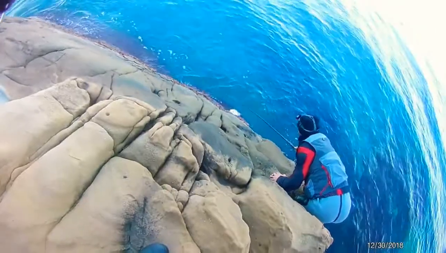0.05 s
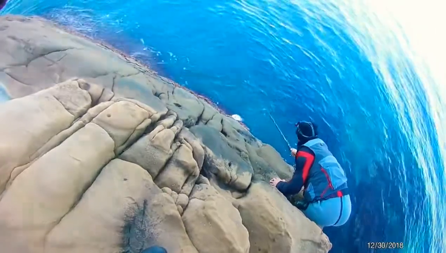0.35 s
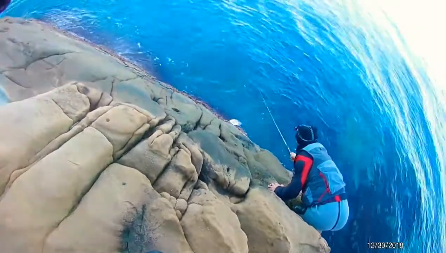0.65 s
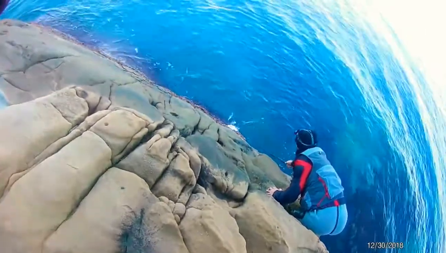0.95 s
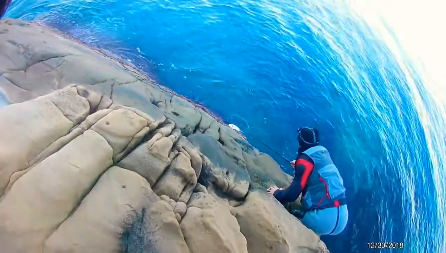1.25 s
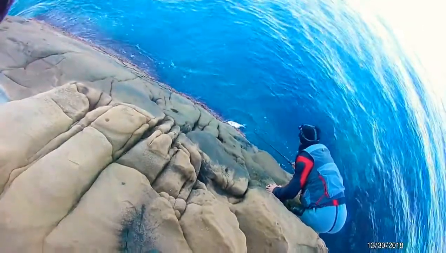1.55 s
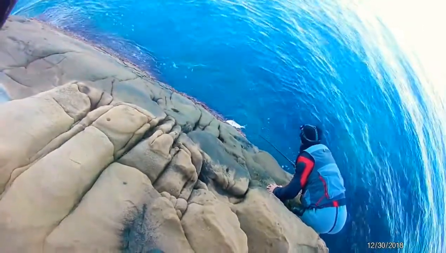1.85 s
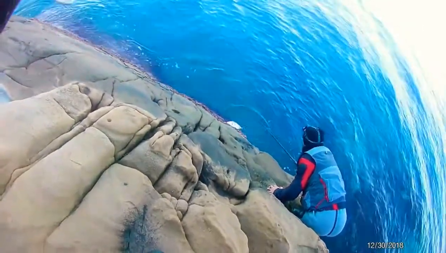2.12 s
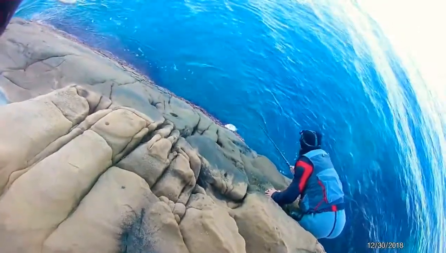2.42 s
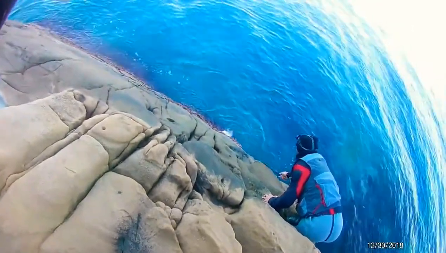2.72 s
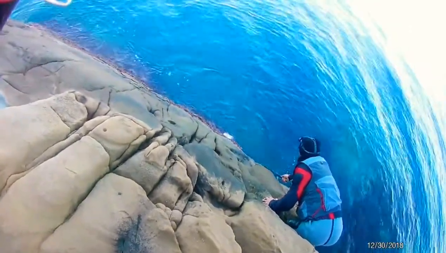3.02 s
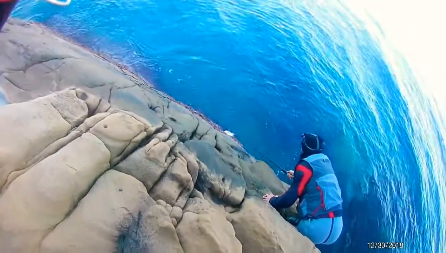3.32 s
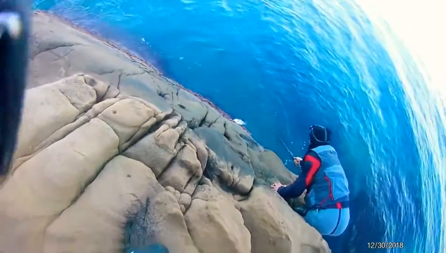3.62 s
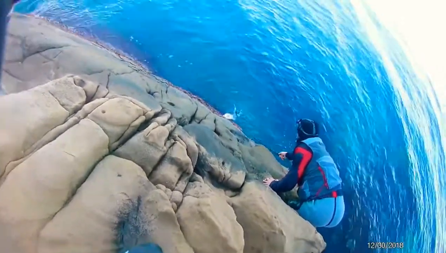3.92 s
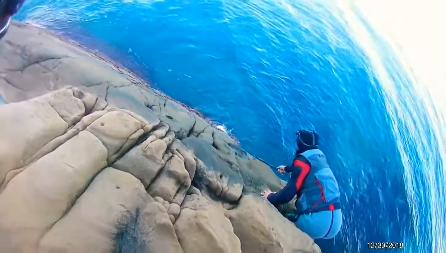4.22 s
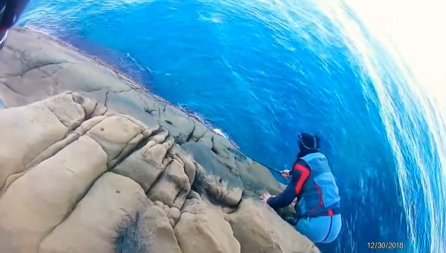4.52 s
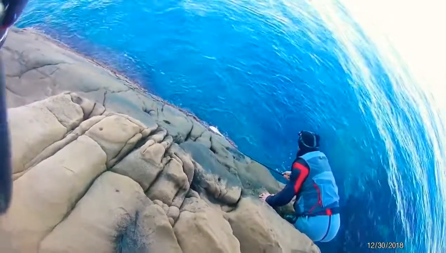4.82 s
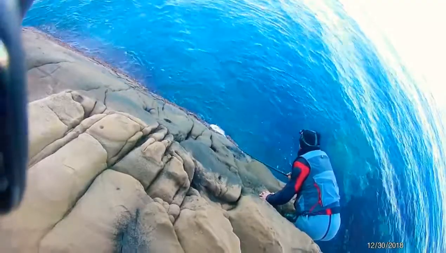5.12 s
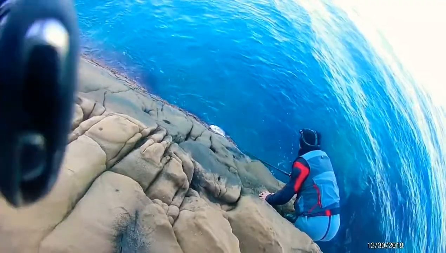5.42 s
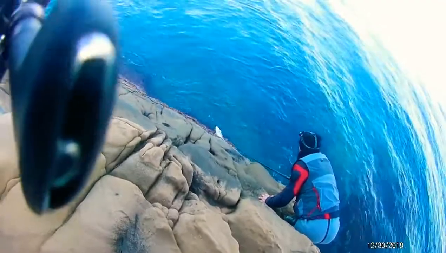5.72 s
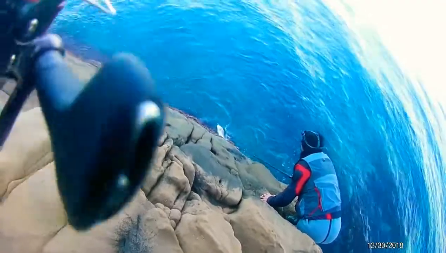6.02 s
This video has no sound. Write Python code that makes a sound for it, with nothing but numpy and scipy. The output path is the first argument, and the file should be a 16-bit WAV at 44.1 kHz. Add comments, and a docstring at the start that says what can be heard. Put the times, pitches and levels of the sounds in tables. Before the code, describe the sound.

Sea water laps and gurgles softly against rocks, a little muffled, with a few sharp close clicks of fishing gear.

```python
"""Sea lapping on a rocky shore

Heard from above the rocks, on the microphone of a small camera in a closed case. The wash swells and
sinks, foam hisses, air pockets gurgle in the clefts and spray pings on the water. Close by, handled
fishing gear clicks and knocks, and one gust brushes past. The case muffles the sound above 1 kHz."""
import sys
import numpy as np
from scipy import signal
from scipy.io import wavfile
from scipy.ndimage import uniform_filter1d

SR = 44100
rng = np.random.default_rng(int(sys.argv[2]) if len(sys.argv) > 2 else 0)


def dump(signal):
    """Clip the signal to [-1, 1] and save it as 16-bit WAV at the path in sys.argv[1]."""
    limited = np.clip(np.atleast_2d(signal).T, -1, 1)
    pcm = np.round(limited * 32767).astype(np.int16)
    wavfile.write(sys.argv[1], SR, pcm)


N = 276066


def amp(db):
    """Decibels to gain."""
    return 10 ** (np.asarray(db) / 20)


def unit(x):
    """Scales to rms 1."""
    return x / np.sqrt(np.mean(x ** 2) + 1e-20)


def decay(t, t60):
    """Falls by 60 dB in t60 seconds."""
    return np.exp(-np.log(1000) * t / t60)


def level_at(spectrum, hz):
    """Level of a spectrum in dB, interpolated along log frequency."""
    freqs, db = np.transpose(spectrum)
    return np.interp(np.log(hz + 1), np.log(freqs), db)


def add(mix, start, sound):
    """Lays a sound into the mix, start seconds in."""
    part = mix[max(round(start * SR), 0):][:len(sound)]
    part += sound[:len(part)]


def colour(x, spectrum):
    """Minimum-phase filter with the given spectrum."""
    hz = abs(np.fft.fftfreq(4096, 1 / SR))
    log_gain = np.log(amp(level_at(spectrum, hz)))
    taps = np.fft.ifft(np.exp(np.conj(signal.hilbert(log_gain)))).real
    return signal.oaconvolve(x, taps[:len(taps) // 2])[:N]


def noise(spectrum, patchy_db):
    """Coloured noise whose level drifts in patches of time and frequency."""
    frames = dict(fs=SR, nperseg=1024, noverlap=768)
    hz, _, bins = signal.stft(rng.standard_normal(N), **frames)
    patches = uniform_filter1d(rng.standard_normal(bins.shape), size=8, axis=0)
    patches = unit(uniform_filter1d(patches, size=8, axis=1))
    bins *= amp(level_at(spectrum, hz)[:, None] + patchy_db * patches)
    return unit(signal.istft(bins, **frames)[1][:N])


def impulses(per_s, spread_db):
    """Random impulses: many small, a few large."""
    size = amp(spread_db * np.minimum(rng.exponential(1, N), 4))
    return size * rng.choice([-1, 1], N) * (rng.random(N) < per_s / SR)


def swell(crest, length, rise_share=0.38):
    """A lopsided bell that builds to 1 at the crest and drains away more slowly."""
    t = (np.arange(N) / SR - crest) / length
    width = np.where(t < 0, rise_share, 1 - rise_share)
    return np.exp(-.5 * (t / width) ** 2)


# waves on the rocks below: (crest time [s], length [s], water [dB], foam [dB], churning [dB])
WAVES = [(0.038, 0.13, -51.5, -76, -75), (0.685, 0.6, -55.5, -72, -61.5), (1.42, 0.43, -56.5, -79, -71),
         (1.987, 0.4, -62, -75.5, -58.5), (2.346, 0.19, -67, -70, -65), (2.595, 0.6, -53, -77, -60),
         (3.48, 0.19, -74, -71, -77), (3.966, 0.6, -56.5, -71, -57), (4.33, 0.69, -49.5, -75, -63.5),
         (5.123, 0.47, -59, -67.5, -58.5), (5.877, 0.42, -52.5, -70.5, -57.5), (6.22, .14, -53, -77, -59)]
def lapping(calm_db=(-55, -78.5, -65)):
    """Levels of running water, foam and churning: each wave adds its power to the calm between waves."""
    power = amp(calm_db)[:, None] ** 2
    for crest, length, *levels_db in WAVES:
        power = power + (amp(levels_db)[:, None] * swell(crest, length)) ** 2
    return np.sqrt(power)


# water, foam and clefts as heard from above, through the case: (frequency [Hz], relative level [dB])
WATER_SPECTRUM = [(150, -18), (290, -15), (420, -4.5), (600, 0.5), (760, -1.5), (930, 1), (1120, -10.5),
                  (1350, -14.5), (1650, -23.5), (2400, -38), (5000, -57)]
FOAM_SPECTRUM = [(900, -25.5), (1500, 0), (1850, 6.5), (2150, 6.5), (2450, -3), (2850, -19.5), (3500, -12),
                 (4700, -17), (6000, -43), (12000, -39)]
CLEFT_SPECTRUM = [(90, -20.5), (170, -7), (260, -1), (380, -1), (520, -7.5), (900, -37), (2000, -64)]
def wash(splash_db=-12, fizz_db=-7):
    """Water and foam rush over the rocks, splashing and fizzing, above a deep churning in the clefts."""
    water = noise(WATER_SPECTRUM, patchy_db=2.5)
    water += amp(splash_db) * unit(colour(impulses(per_s=240, spread_db=2.5), WATER_SPECTRUM))
    foam = noise(FOAM_SPECTRUM, patchy_db=1.5)
    foam += amp(fizz_db) * unit(colour(impulses(per_s=160, spread_db=12), FOAM_SPECTRUM))
    churn = noise(CLEFT_SPECTRUM, patchy_db=2.5)
    water_level, foam_level, churn_level = lapping()
    return water_level * unit(water) + foam_level * unit(foam) + churn_level * churn


def bubble(hz, t60, rise=0.15, onset_s=0.0035):
    """A pocket of air rings, rising in pitch as it nears the surface."""
    t = np.arange(SR // 6) / SR
    pitch = hz * (1 + rise * t / t60)
    ring = np.sin(2 * np.pi * np.cumsum(pitch) / SR)
    ring *= (1 - np.exp(-t / onset_s)) * decay(t, t60)
    return ring / abs(ring).max()


# large air pockets down among the rocks: (time [s], level [dB], starting pitch [Hz])
AIR_POCKETS = [(.758, -45, 653), (1.239, -45, 258), (1.353, -44, 291), (1.618, -43.5, 440),
               (1.804, -44, 371), (1.964, -49, 334), (3.042, -40.5, 539), (3.054, -44.5, 293),
               (3.251, -47, 313), (3.71, -42, 399), (3.759, -40.5, 569), (3.828, -43.5, 244),
               (3.976, -42.5, 384), (4.415, -44, 322), (4.615, -44.5, 275), (4.893, -49.5, 268),
               (5.334, -42.5, 410), (5.52, -43, 578), (5.593, -49, 212), (5.828, -48, 241)]
def gurgles(ring_cycles=34, level_wobble=0.53, pitch_wobble=0.055):
    """Large pockets glug one by one, wobbling as the water kneads them; deep ones ring longer."""
    out = np.zeros(N)
    smoothing = signal.windows.hann(SR // 160)
    for start, db, hz in AIR_POCKETS:
        t60 = ring_cycles / hz
        squeeze = unit(signal.oaconvolve(rng.standard_normal(SR // 6), smoothing, "same"))
        bend = unit(signal.oaconvolve(rng.standard_normal(SR // 6), smoothing, "same"))
        kneaded = bubble(hz * (1 + pitch_wobble * bend), t60) * (1 + level_wobble * squeeze)
        add(out, start, amp(db) * bubble(hz, t60).std() * unit(kneaded))  # kneading keeps the energy
    return out


def small_bubbles(relative_db=-12, low_hz=280, high_hz=1400, ring_cycles=26, db_per_octave=-1):
    """Small bubbles ring at random, swelling and sinking with the running water."""
    out = np.zeros(N)
    for hz in np.geomspace(low_hz, high_hz, num=24):
        rings = signal.oaconvolve(impulses(per_s=4, spread_db=1), bubble(hz, ring_cycles / hz))[:N]
        out += amp(db_per_octave * np.log2(hz / low_hz)) * rings
    water_level = lapping()[0]
    return amp(relative_db) * water_level * unit(out)


# drops landing on the water below: (time [s], peak level [dB], starting pitch [Hz])
SPRAY_DROPS = [(0.288, -54, 1460), (0.316, -69.5, 3820), (.745, -67.5, 4300), (1.466, -59, 1820),
               (1.625, -72, 3420), (4.343, -65, 3580)]
def spray(t60=0.03, pitch_wobble=0.057):
    """Spray falls back with faint, unsteady pings."""
    out = np.zeros(N)
    for start, db, hz in SPRAY_DROPS:
        bend = unit(uniform_filter1d(rng.standard_normal(SR // 6), size=60))
        add(out, start, amp(db) * bubble(hz * (1 + pitch_wobble * bend), t60))
    return out


def gear_ring(t, hz, t60, onset_s=0.00065, seat_s=0.0078, damping_s=0.00042, octave_db=-27):
    """A piece of gear rings for a few cycles, then stops short as it seats."""
    phase = 2 * np.pi * hz * t
    ring = np.sin(phase) + amp(octave_db) * np.sin(2 * phase)  # one-sided contact adds the octave
    seating = .5 * (1 - np.tanh((t - seat_s) / damping_s))
    ring *= (1 - np.exp(-t / onset_s)) * decay(t, t60) * seating
    return ring / abs(ring).max()


# modes of the case around the microphone: (frequency [Hz], relative level [dB], t60 [s])
CASE_MODES = [(330, -47, 0.02), (700, 9.5, 0.024), (951, 14.5, 0.016), (1260, 3.5, 0.015),
              (1630, -2.5, 0.011), (2050, -57, 0.0087), (3530, -54, 0.0012)]
# close clicks, ahead of the wall: (time [s], ring level [dB], pitch [Hz], t60 [s], knock level [dB])
GEAR_CLICKS = [(.3347, -40.5, 755, 0.029, -59), (.7615, -31, 646, 0.021, -58),
               (0.9142, -37, 520, 0.0071, -48), (1.2887, -37, 994, .023, -51),
               (1.3494, -41.5, 930, .025, -58), (1.4013, -37.5, 734, .02, -50),
               (1.9304, -39, 740, 0.014, -49), (2.083, -44.5, 1820, 0.0055, -41),
               (2.732, -43, 1280, 0.029, -46), (2.8145, -30, 566, 0.007, -29.5),
               (2.818, -25.5, 1180, 0.005, -33), (2.8199, -31.5, 970, 0.034, -49),
               (2.8352, -30.5, 860, 0.047, -40), (3.1048, -41, 1110, .018, -53),
               (3.6073, -40.5, 770, .028, -52), (4.0703, -31.5, 775, 0.012, -39),
               (4.5573, -12, 878, 0.028, -25.5), (4.664, -39, 1140, 0.0081, -36),
               (4.6883, -22.5, 673, 0.0053, -18), (4.9798, -35.5, 820, .013, -47),
               (5.3814, -43, 884, 0.043, -43), (5.9106, -34.5, 1196, 0.043, -31),
               (6.0707, -34, 654, 0.012, -44), (6.231, -40, 875, 0.031, -40)]
# brief scrapes on the case, ahead of the wall: (time [s], level [dB])
GEAR_SCRAPES = [(.9126, -39), (2.8118, -37.5), (2.8209, -35.5), (2.833, -39), (2.8378, -37.5),
                (4.5574, -40), (4.6875, -39), (5.912, -45)]
# what the wall of the case passes on to the microphone: (frequency [Hz], gain [dB])
CASE_WALL = [(70, -6.5), (200, -2.5), (550, 0), (950, -1), (1400, -5), (1950, 2.5), (2500, -8), (3200, -8),
             (3800, 5), (5500, -1.5)]
def fishing_gear(knock_onset_s=0.0004, scrape_t60=0.048, tick_db=-43, tick_count=12):
    """Gear handled close to the microphone rings, and knocks, scrapes and ticks on the case."""
    out = np.zeros(N)
    t = np.arange(SR // 20) / SR
    case = sum(amp(db) * np.sin(2 * np.pi * hz * t) * decay(t, t60) for hz, db, t60 in CASE_MODES)
    knock = case * (1 - np.exp(-t / knock_onset_s))
    knock /= abs(knock).max()
    for start, ring_db, hz, t60, knock_db in GEAR_CLICKS:
        add(out, start, amp(ring_db) * gear_ring(t, hz, t60) + amp(knock_db) * knock)
    for start, db in GEAR_SCRAPES:
        rub = unit(signal.oaconvolve(rng.standard_normal(len(t)), case)[:len(t)])
        add(out, start, amp(db) * rub * decay(t, scrape_t60))
    for start in rng.random(tick_count) * N / SR:
        add(out, start, amp(tick_db) * knock)
    return colour(out, CASE_WALL)


# wind right on the case: (frequency [Hz], relative level [dB])
WIND_SPECTRUM = [(15, -14.5), (30, 0), (46, 2.5), (70, -1.5), (105, -3.5), (170, -11.5), (300, -32),
                 (800, -69)]
# buffets within the gust: (time [s], level [dB])
GUST_BUFFETS = [(1.06, -58.5), (1.24, -53.5), (1.37, -53.5), (1.57, -50.5), (1.96, -62)]
def wind(draught_db=-70.5, gust_db=-62, evenness=0.6):
    """A light draught flutters on the case, and one buffeting gust brushes past."""
    flutter = noise(WIND_SPECTRUM, patchy_db=2.5)
    eddy_power = abs(uniform_filter1d(flutter ** 2, size=3000)) + 1e-6
    flutter = unit(flutter / eddy_power ** (evenness / 2))  # eddies of like strength
    gust = amp(gust_db) * swell(crest=1.35, length=1.07)
    buffet_power = sum((amp(db) * swell(crest, length=0.093)) ** 2 for crest, db in GUST_BUFFETS)
    return np.sqrt(amp(draught_db) ** 2 + gust ** 2 + buffet_power) * flutter


# low tones behind the water: (frequency [Hz], level [dB])
DRONE_TONES = [(47, -73.5), (58, -76.5), (120, -74)]
def drone(waver_hz=4):
    """A faint, low drone, each tone wavering in pitch on its own."""
    out = np.zeros(N)
    for hz, db in DRONE_TONES:
        drift = unit(uniform_filter1d(rng.standard_normal(N), size=5000))
        out += amp(db) * unit(np.sin(2 * np.pi * np.cumsum(hz + waver_hz * drift) / SR))
    return out


# the bed of noise at the microphone: (frequency [Hz], relative level [dB])
BACKGROUND_SPECTRUM = [(40, 23), (150, 24), (300, 28), (700, 26), (1500, 8.5), (2800, 5), (4500, 2),
                       (6500, -5), (11000, -7), (15500, -5)]
def background(level_db=-64):
    """A steady, dull hiss lies under the shore."""
    return amp(level_db) * noise(BACKGROUND_SPECTRUM, patchy_db=1)


def scene():
    """Sea below, gear close by and the air around, in mono at one microphone."""
    sea = wash() + gurgles() + small_bubbles() + spray()
    return (sea + fishing_gear() + wind() + drone() + background())[None]


def record(dry, slip_hz=3900, slip_samples=0.29, jitter_samples=0.14, cutoff_hz=15600):
    """The camera's slightly uneven sample timing mirrors the sound into the treble; a low-pass follows."""
    phase = 2 * np.pi * slip_hz * np.arange(N) / SR
    sawtooth = sum(np.sin(k * phase) / k for k in range(1, 5))
    jitter = unit(uniform_filter1d(rng.standard_normal(N), size=2))
    timing_error = slip_samples * sawtooth + jitter_samples * jitter
    mirrored = dry + timing_error * np.gradient(dry, axis=1)
    lowpass = signal.firwin(511, cutoff_hz, window=("kaiser", 9), fs=SR)
    return signal.oaconvolve(mirrored, lowpass[None], "same")


dry = scene()
out = record(dry)
dump(out)
```